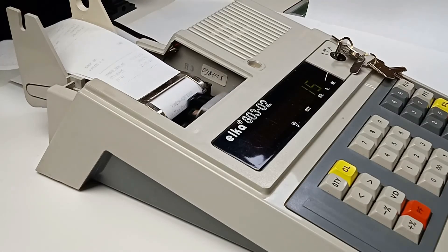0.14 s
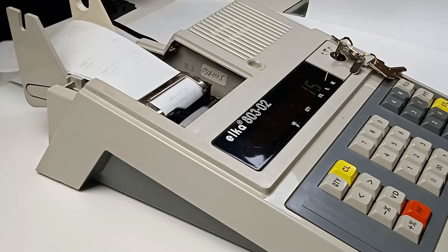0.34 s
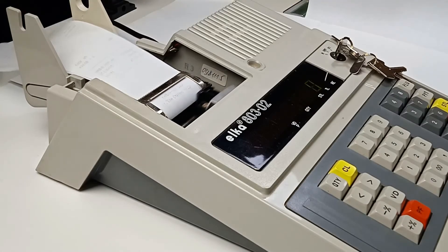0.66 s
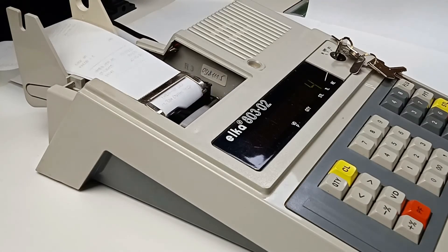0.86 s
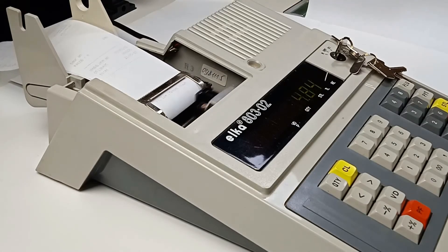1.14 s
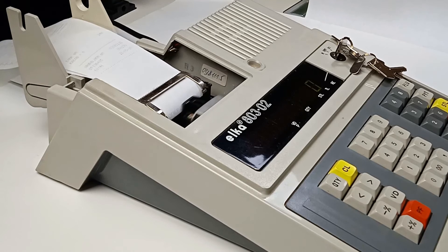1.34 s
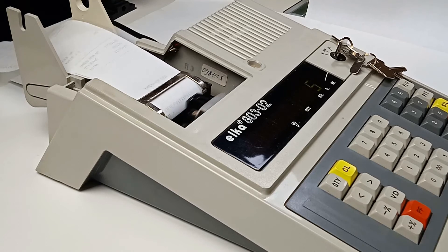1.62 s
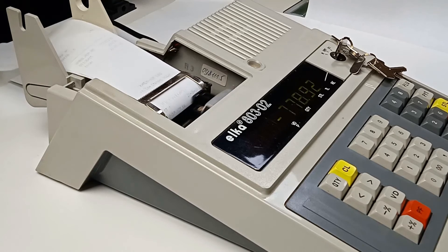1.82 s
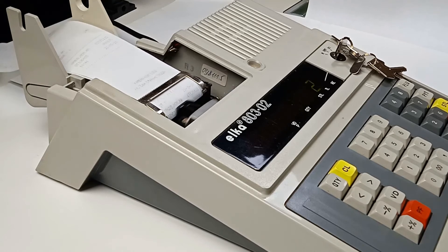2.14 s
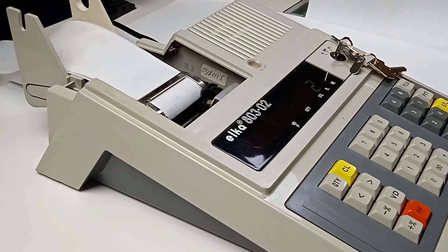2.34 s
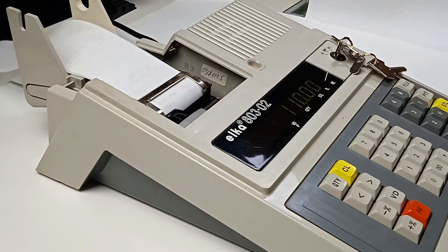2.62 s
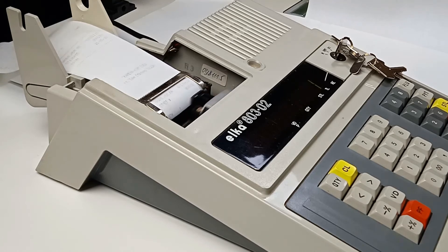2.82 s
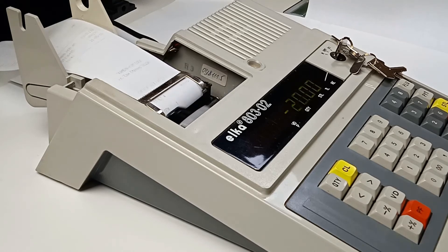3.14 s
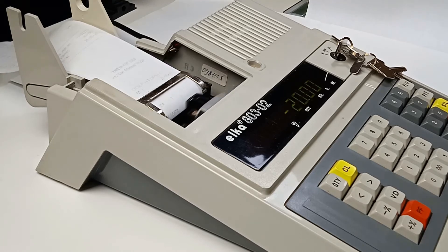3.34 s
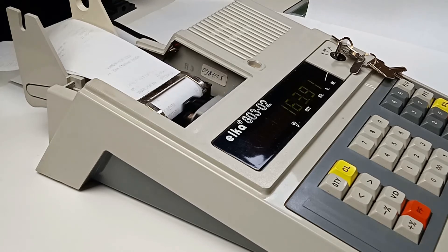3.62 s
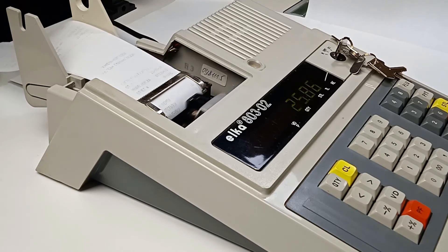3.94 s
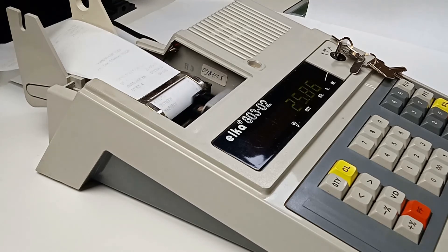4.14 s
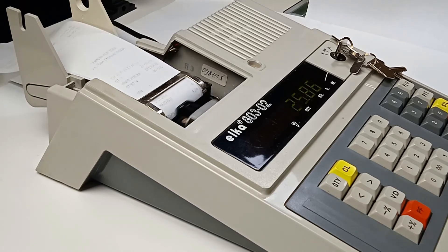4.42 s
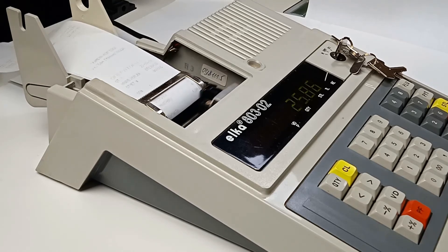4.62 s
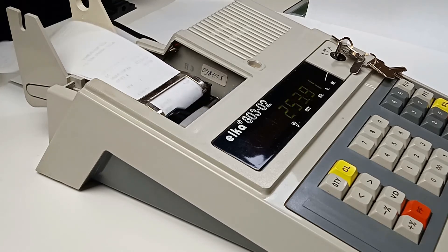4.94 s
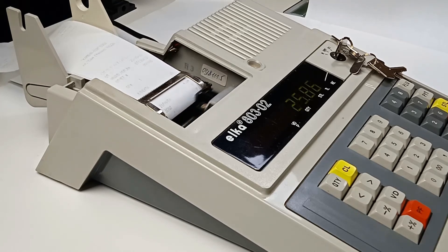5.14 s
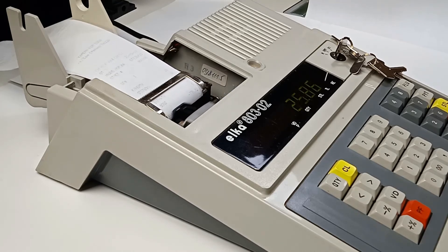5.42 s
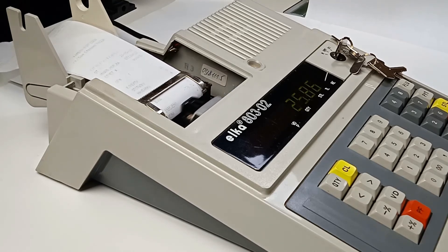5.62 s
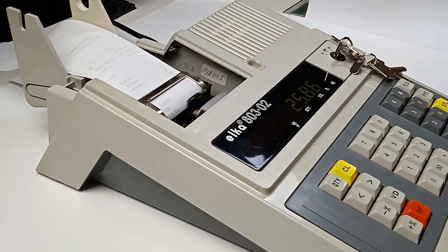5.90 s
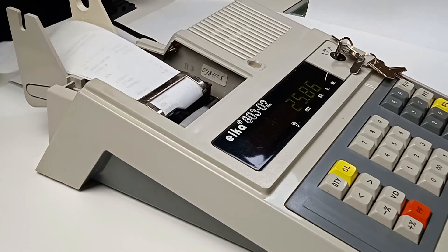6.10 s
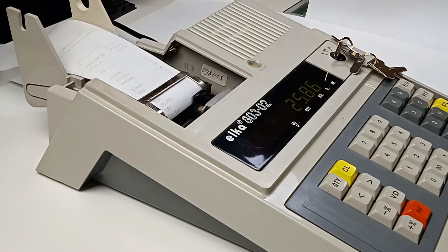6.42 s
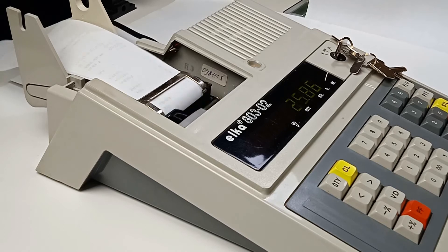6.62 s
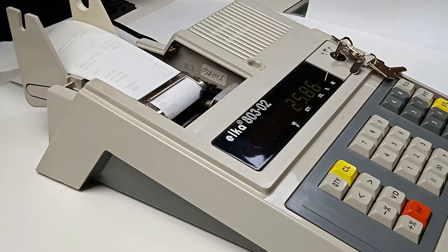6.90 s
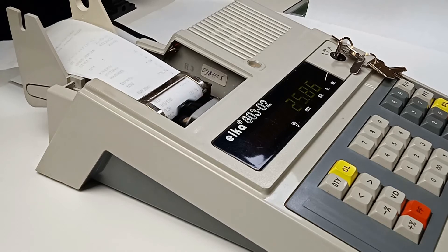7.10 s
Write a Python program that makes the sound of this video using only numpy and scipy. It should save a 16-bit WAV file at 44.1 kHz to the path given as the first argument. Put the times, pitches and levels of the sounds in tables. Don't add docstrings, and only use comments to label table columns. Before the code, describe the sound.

Close stereo pickup of an old dot matrix receipt mechanism. It opens mid-print with dense raspy buzzing, pauses while the carriage keeps shuttling, buzzes again, falls mostly quiet around two and a half seconds, then settles into regular short zips to the end. Crisp latch clicks, soft thuds and a faintly whining, sagging motor keep a steady mechanical beat over low room rumble, with a short room tail.

```python
import sys
import numpy as np
from scipy import signal
from scipy.fft import rfft, irfft, next_fast_len
from scipy.io import wavfile
from scipy.ndimage import uniform_filter1d

SR = 44100
rng = np.random.default_rng(int(sys.argv[2]) if len(sys.argv) > 2 else 0)


def output_pcm(signal):
    pcm = np.clip(np.atleast_2d(signal).T, -1, 1) * 32767
    wavfile.write(sys.argv[1], SR, np.round(pcm).astype(np.int16))


def boost_factor(decibels):
    exponent = np.asarray(decibels, float) / 20
    return 10 ** exponent


N = 320163

COLUMN_HZ = 662.4
ROUND_S = .57444
ONSET_SAMPLES = 60

# (frequency [Hz], level [dB per Hz])
HEAD = [(200, -46.5), (400, -41.5), (660, -20.5), (1000, -13.5), (1330, -17), (1600, -22.5), (2000, -8.5),
        (2500, -8.5), (3300, -6.5), (4000, -10.5), (4700, -6), (7500, -1), (11000, 0), (15600, -2)]
# (frequency [Hz], T60 [s])
HEAD_T60 = [(400, .12), (2000, .06), (6000, .022), (16000, .014)]


def needle_voices(number, size):
    return rfft([dying_noise(HEAD, HEAD_T60, .16, tick=.6) for _ in range(number)], size)


# (frequency [Hz], width [Hz], level re head [dB])
FRAME = [(659.4, 46, -24.5), (1332, 80, -24), (2280, 160, -13.5), (3550, 300, -15), (4460, 88, -6),
         (7520, 460, -6.5), (10930, 570, -6)]


def frame_rings(hz):
    rings = [boost_factor(db) / (1 + 1j * (hz - ring_hz ** 2 / hz) / width_hz) for ring_hz, width_hz, db in FRAME]
    return np.array(rings) * np.exp(-2j * np.pi * hz * ONSET_SAMPLES / SR)


LETTER_DB = [2.5, -2.7, -0.5, -4, 4, 0.5, -1.5, -1, 6, 1.5, -3, -14]
MARGIN_S, FIELD_S, FIELD_SHIFT_S = .5422, .035, .0024
HEADING_UNTIL_S, HEADING_INDENT_COLUMNS = .5, 5
STEM_DB = 3


def column_levels(word, count, weak_db, stems):
    start, _, first_db, last_db, ragged = word
    place_s = (start - MARGIN_S + FIELD_S / 2) % ROUND_S - FIELD_S / 2
    place_s -= FIELD_SHIFT_S * (place_s > FIELD_S)
    column = round(place_s * COLUMN_HZ) + np.arange(count)
    if start < HEADING_UNTIL_S:
        column = (column - HEADING_INDENT_COLUMNS) // 2
    db = np.linspace(first_db, last_db, count)
    db[1::2] += weak_db * (.5 + ragged)
    return db + ragged * np.take(LETTER_DB, column, mode="wrap") + STEM_DB * stems


def needle_shares(draws):
    fires = np.tanh(2 * draws.T - .6)
    fires[:, 0] = np.maximum(fires[:, 0], .5)
    share = boost_factor(9 * fires)
    return share / np.mean(share ** 2, axis=0) ** .4


# (start [s], stop [s], first level [dB], last level [dB], raggedness [0 dense - 1
WORDS = [(0.0053, 0.1456, -23.5, -26.5, 0.55), (1.6915, 1.7614, -28, -27.5, 0.17),
         (1.8763, 1.8786, -24.5, -36, .5), (1.894, 1.91, -30.5, -27.5, 0.32),
         (2.2662, 2.321, -26, -29, 0.21), (2.422, 2.4255, -23, -26, 0.28),
         (2.4392, 2.4876, -27.5, -29, .5), (2.9775, 2.979, -21.5, -25, .3),
         (3.0324, 3.066, -26, -32, 0.46), (3.414, 3.4278, -31, -25, 0.9),
         (3.5684, 3.6364, -27, -28.5, 0.53), (3.99, 3.999, -24, -32, 0.41),
         (4.1337, 4.2106, -26, -28.5, .3), (4.564, 4.572, -29, -31.5, 0.37),
         (4.7188, 4.7845, -27.5, -26.5, .5), (5.138, 5.202, -28.5, -29.5, 0.29),
         (5.7122, 5.767, -29, -28, 0.52), (5.8963, 5.931, -27, -26.5, 0.33),
         (6.2862, 6.3386, -28.5, -29, 0.41), (6.469, 6.502, -30, -23.5, .3),
         (6.8607, 6.913, -28.5, -26, 0.42), (7.0441, 7.0781, -28.5, -28, 0.25),
         (0.271, 0.3314, -30, -29, 0.5), (0.343, 0.463, -27, -27.5, 0),
              (1.41, 1.5823, -27.5, -28, 1.2), (1.983, 2.086, -27, -26.5, 0.87),
              (2.1292, 2.207, -24, -27.5, 1), (3.7068, 3.779, -26.5, -26.5, 0.57),
              (3.918, 3.927, -32, -28, 0.5), (4.4653, 4.5016, -30, -27.5, 0.6),
              (4.8555, 4.892, -27.5, -26, 0.4), (5.068, 5.0735, -27, -22, 0.2),
              (5.4304, 5.502, -28.5, -24, 0.75), (5.6427, 5.651, -25.5, -24, 1),
              (6.004, 6.078, -27.5, -24.5, 0.3), (6.2183, 6.2185, -20.5, -47, 0.45),
              (6.578, 6.651, -27, -25.5, 0.79), (7.1528, 7.188, -27.5, -28, 0.16)]
STEM_SHARE = .12
FRAME_SPREAD_DB = 4
PLATEN_DB, CASE_DB, CASE_RAGGED_DB = -1.5, -12.5, 2
FLIP_SHARE, FLIP_FROM_HZ, FLIP_TO_HZ = .2, 1600, 5600


def needles(weak_db, likeness, count):
    size = 16384
    bank = needle_voices(3 * count, size)
    hz = bin_hz(size)
    frame = frame_rings(hz)
    flip_band = 1 / (1 + (hz / FLIP_TO_HZ) ** 8) / (1 + (FLIP_FROM_HZ / hz) ** 8)
    out = np.zeros(N + size)
    for word in sorted(WORDS):
        start, stop, _, _, ragged = word
        ticks_s = np.arange(start, stop, 1 / COLUMN_HZ) - start
        draws = rng.standard_normal((len(ticks_s), count + 1))
        order = rng.permutation(3 * count)
        voices = likeness * bank[order[-1]] + bank[order[:count]]
        voices += boost_factor(FRAME_SPREAD_DB * rng.standard_normal(len(FRAME))) @ frame

        stems = rng.random(len(ticks_s)) < STEM_SHARE
        db = column_levels(word, len(ticks_s), weak_db, stems)
        jitter_samples = .9 * draws[:, -1].clip(-1.4, 2)
        at = (ticks_s * SR + 2 + jitter_samples).astype(int)
        trains = np.zeros((count, size))
        trains[:, at] = boost_factor(db) * needle_shares(draws[:, :-1])

        signs = np.where(rng.random(9973) < FLIP_SHARE, -1, 1)
        flipped = trains * np.resize(signs, trains.shape)
        blows = flip_band * rfft(flipped) + (1 - flip_band) * rfft(trains)
        case_db = CASE_DB + CASE_RAGGED_DB * ragged
        tone = [(3500, case_db + 12), (5000, PLATEN_DB + 3), (8000, PLATEN_DB + 3), (10000, 0)]
        sound = irfft((blows * voices).sum(axis=0) * boost_factor(at_hz(tone, hz)))
        first = int(start * SR - ONSET_SAMPLES - 2)
        out[first:][:size] += sound
    return out[:N]


CAM_S = [
    .1195,
    .1228,
    .2016,
    .2198,
    .4095,
    .489,
    .507,
]
# (level [dB], contact length [s], thud re click [dB])
CAMS = [
    (-35, 0.0088, -5),
    (-24.5, .001, -8),
    (-43.5, 0.016, -12.5),
    (-21, 0.0011, -26),
    (-23.5, 0.0012, -16),
    (-46, 0.021, -10),
    (-17, 0.00046, -25),
]
# (frequency [Hz], level [dB per Hz])
CLICK = [(1000, -66), (1800, -12), (2300, -9), (3500, -17), (5000, -15.5), (7700, -5), (10200, 0.5),
         (11800, -3), (12800, -2.5), (13800, -1), (15000, -1)]
# (frequency [Hz], level [dB per Hz])
THUD = [(200, -69), (400, -13.5), (620, -14), (860, -5.5), (1200, -1.5), (1600, -19.5), (2400, -10.5),
        (4500, -16.5), (6000, -19)]


def cams(spread_db):
    clicks, thuds = np.zeros(2 * N), np.zeros(2 * N)
    for turn in range(13):
        for s, (db, length_s, thud_db) in zip(CAM_S, CAMS):
            grit = rng.standard_normal(1200)
            level_draw, time_draw = rng.standard_normal(2)
            at = int((s - .0014 + turn * ROUND_S + .0004 * time_draw) * SR)
            n = int(np.clip(length_s * SR, 2, 1200))
            blow_db = db + spread_db * level_draw
            clicks[at:at + n] += boost_factor(blow_db) * rms_one(grit[:n])
            thuds[at:at + n] += boost_factor(blow_db + thud_db) * grit[:n]
    click = dying_noise(CLICK, [(2000, 0.13), (8000, 0.02), (16000, 0.033)], 0.062, tick=1.0)
    thud = dying_noise(THUD, [(400, 0.055), (1200, 0.079), (4000, 0.056)], 0.41, tick=0.41)
    return strike(clicks[:N], click) + strike(thuds[:N], thud)


# (time [s], whine level [dB], load on gear hiss [dB])
SWEEP = [(.06, -68, 0), (.09, -55, 3), (.125, -51, 9), (.165, -57, 2), (.19, -84, 5), (0.231, -81, 8.5),
         (0.269, -66, 2.5)]
# (time [s], frequency [Hz])
SAG = [(.07, 1325), (.1, 1305), (.135, 1262), (.18, 1250), (.22, 1290), (.26, 1325)]
# (frequency [Hz], level [dB per Hz])
GEARS = [(200, -44), (400, -30), (620, -7), (800, -13.5), (1200, -8), (1550, -17.5), (2000, -11),
         (2500, -15), (3500, -21.5), (5500, -21), (8000, -14.5), (10800, -20.5), (12200, -29),
         (15600, -19.5)]
# (frequency [Hz], width [Hz], level [dB])
GEAR_RINGS = [(617, 107, -70.5), (715.4, 22, -71), (1882, 75, -68.5), (2264, 170, -68.5), (10800, 790, -68),
              (13500, 1000, -66)]
GEARS_DB = -53.5


def motor():
    t = np.arange(N) / SR
    s, *columns = np.transpose(SWEEP)
    whine_db, load_db = [np.interp(t, s, c, period=ROUND_S / 2) for c in columns]
    teeth_hz = np.interp(t, *np.transpose(SAG), period=ROUND_S / 2)
    teeth = 2 * np.pi * np.cumsum(teeth_hz) / SR
    fast, medium, slow = [rms_one(uniform_filter1d(rng.standard_normal(N), size=n)) for n in (150, 1500, 3000)]
    whine = boost_factor(whine_db + 1.0 + 1.7 * medium) * np.sin(teeth)
    hum = boost_factor(-73.5 + 5.1 * slow) * np.sin(teeth / 12 + 0.26 * medium)

    rattle = rng.standard_normal((2, N)) * boost_factor(1.5 * fast + 1.5 * medium)
    mid, side = [boost_factor(GEARS_DB + load_db - 2.5) * coloured(r, GEARS) for r in rattle]
    for ring_hz, width_hz, db in GEAR_RINGS:
        ring = band(rattle[0], ring_hz - width_hz / 2, ring_hz + width_hz / 2)
        mid += boost_factor(db + .5 * load_db) * rms_one(ring)
    return stereo(mid + whine + hum, side)


# (frequency [Hz], level [dB])
TAIL = [(300, 10), (1500, -3), (4000, 0), (9000, -0.5), (16000, -5.5)]
# (frequency [Hz], T60 [s])
ROOM_T60 = [(400, 0.093), (3000, 0.37), (9000, 0.19), (16000, 0.2)]


def room(x, wet_db, side_db):
    tail = np.r_[np.zeros(SR // 200), dying_noise(TAIL, ROOM_T60, .6, tick=.02)]
    scatter = dying_noise(TAIL, [(400, 0.43), (16000, 0.11)], .15, tick=0.3)
    return stereo(x + boost_factor(wet_db) * strike(x, tail), boost_factor(side_db) * strike(x, scatter))


# (frequency [Hz], level [dB per Hz])
AIR = [(12, -46), (20, -26), (59, -4), (108, -11), (161, 0), (280, -0.5), (431, 4.5), (500, 0.5),
       (650, -26), (1100, -120)]
AIR_DB = -70


def air():
    return boost_factor(AIR_DB) * stereo(*[coloured(w, AIR) for w in rng.standard_normal((2, N))])


def dying_noise(spectrum, t60s, seconds, tick):
    t = np.arange(next_fast_len(int(seconds * SR))) / SR
    edges_hz = 280 * 2 ** np.arange(0, 6.3, .5)
    out = np.zeros(len(t))
    for low, high in zip(edges_hz, edges_hz[1:]):
        hz = np.sqrt(low * high)
        noise = rng.standard_normal(len(t)) * boost_factor(-60 * t / max(at_hz(t60s, hz), .002))
        out += np.sqrt(hz) * rms_one(band(noise, low, high))
    out = rms_one(out)
    out += tick * np.sqrt(len(t) / 8) * rng.standard_normal(len(t)) * np.exp(-t / .0005)
    bins = rfft(out)
    power = uniform_filter1d(np.abs(bins) ** 2, size=int(500 * seconds))
    even = irfft(bins / np.sqrt(power), len(t))
    rise = np.minimum(np.arange(len(t)) / ONSET_SAMPLES, 1) ** 2
    return np.roll(coloured(even, spectrum), ONSET_SAMPLES) * rise / np.sqrt(len(t))


def strike(blows, answer):
    return signal.fftconvolve(blows, answer)[:N]


# (frequency [Hz], side re mid [dB])
WIDTH = [(30, -16), (60, -12), (130, -13), (500, -13), (1000, -10), (2000, -15.5), (4000, -17.5),
         (6000, -32), (9000, -11), (12000, -2), (16000, -22)]


def stereo(mid, side):
    side = equalized(side, WIDTH)
    return np.array([mid + side, mid - side])


def coloured(x, spectrum):
    return rms_one(equalized(x, spectrum))


def equalized(x, gains):
    size = next_fast_len(len(x))
    return irfft(rfft(x, size) * boost_factor(at_hz(gains, bin_hz(size))), size)[:len(x)]


def bin_hz(size):
    return np.maximum(np.fft.rfftfreq(size, 1 / SR), 1)


def at_hz(points, hz):
    table_hz, values = np.transpose(points)
    return np.interp(np.log(hz), np.log(table_hz), values)


def band(x, low_hz, high_hz):
    sos = signal.butter(2, [low_hz, min(high_hz, .45 * SR)], "band", fs=SR, output="sos")
    return signal.sosfilt(sos, x)


def rms_one(x):
    return x / np.sqrt(np.mean(x ** 2) + 1e-20)


def scene():
    hits = boost_factor(14.0) * needles(weak_db=-3.5, likeness=0.19, count=5) + cams(spread_db=-0.2)
    return room(hits, wet_db=-10.0, side_db=-7.0) + motor() + air()


def top_cut(x):
    return signal.sosfilt(signal.butter(12, 16980, fs=SR, output="sos"), x)


def record(dry):
    lean_db = np.array([[.17], [-.17]])
    steep = signal.ellip(8, .5, 26, 15700, fs=SR, output="sos")
    top = signal.cheby2(10, 40, 17100, fs=SR, output="sos")
    mix = signal.sosfilt(np.r_[steep, top], dry * boost_factor(lean_db))
    return top_cut(mix)


dry = scene()
out = record(dry)
output_pcm(out)
```